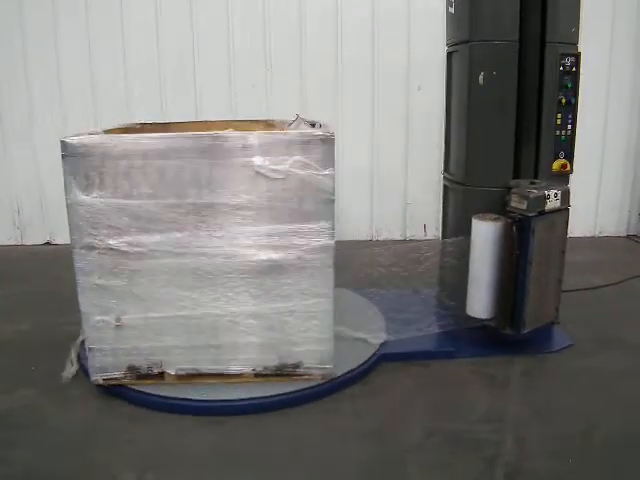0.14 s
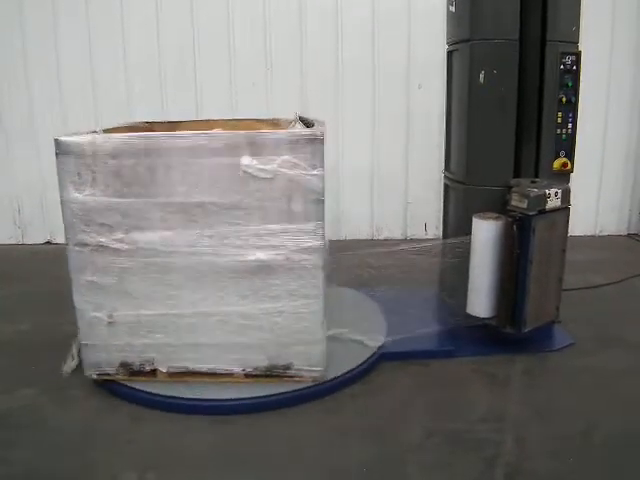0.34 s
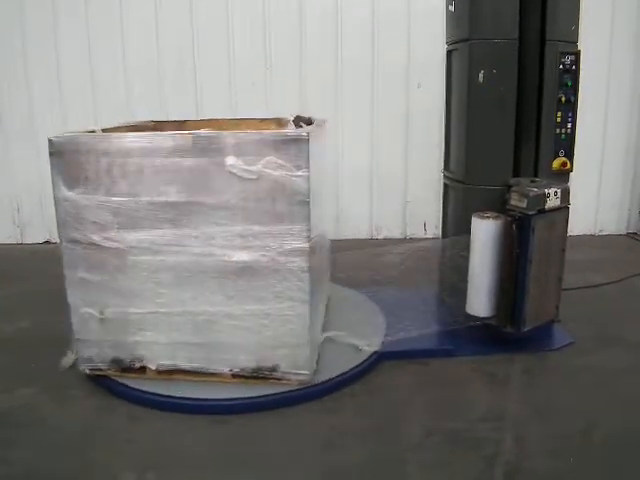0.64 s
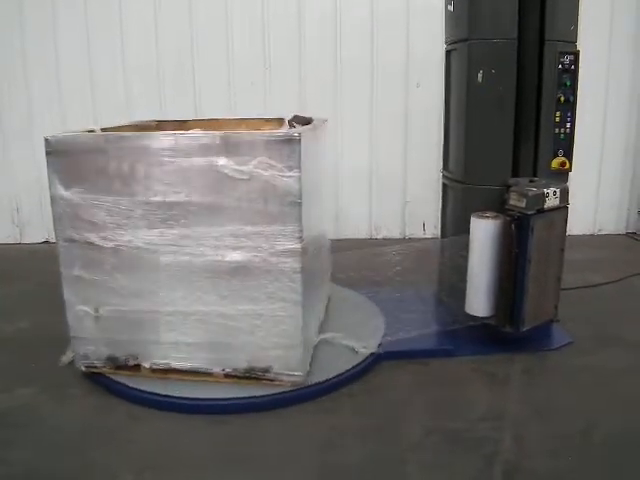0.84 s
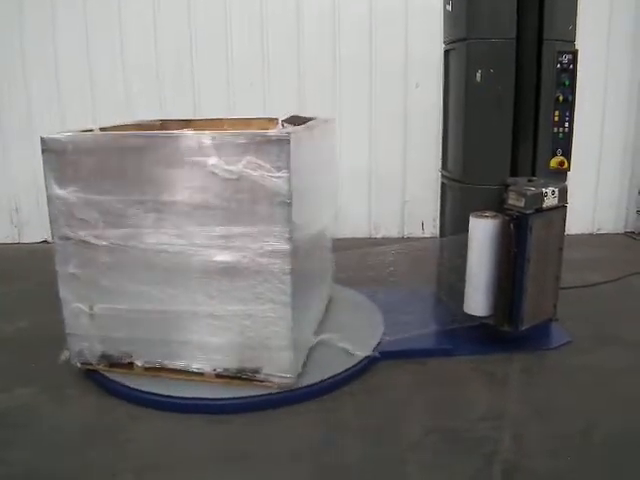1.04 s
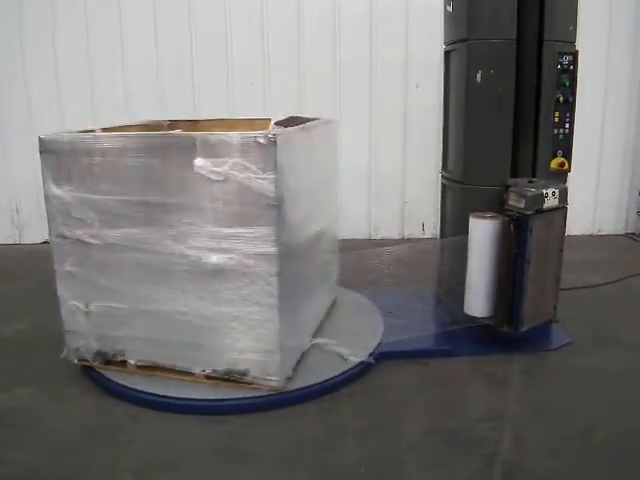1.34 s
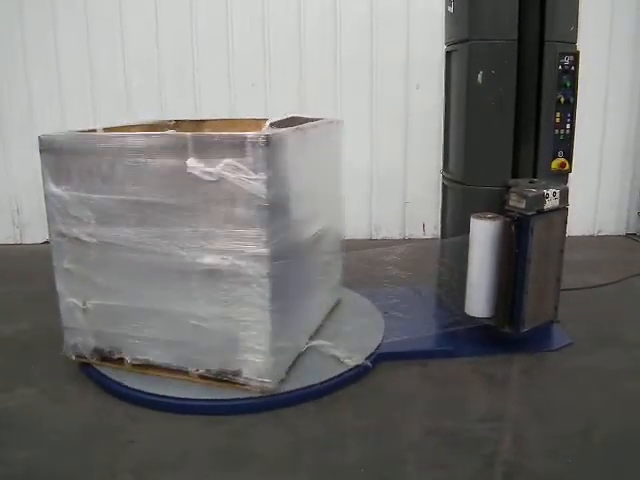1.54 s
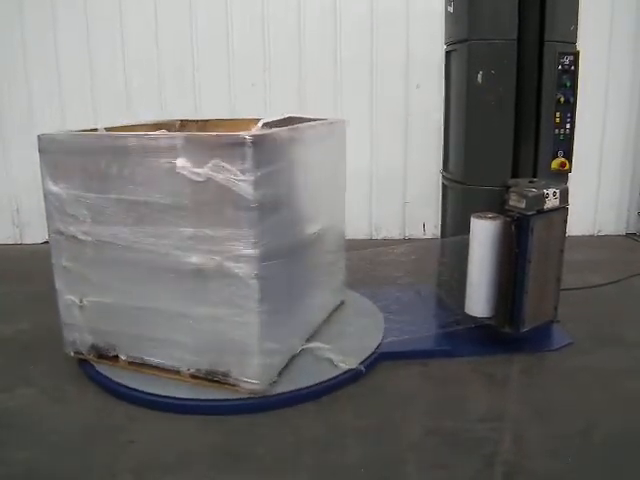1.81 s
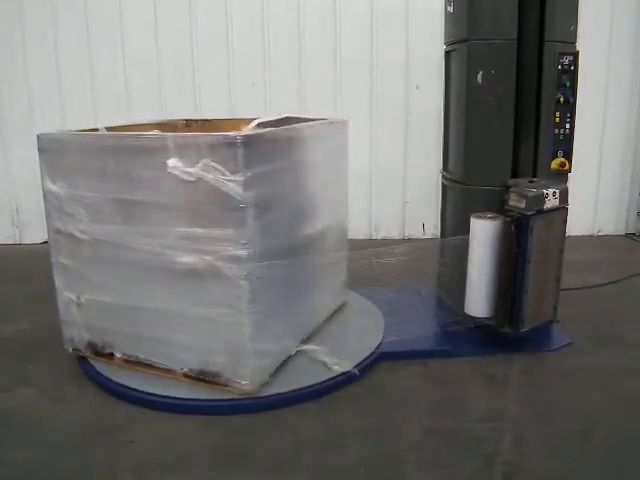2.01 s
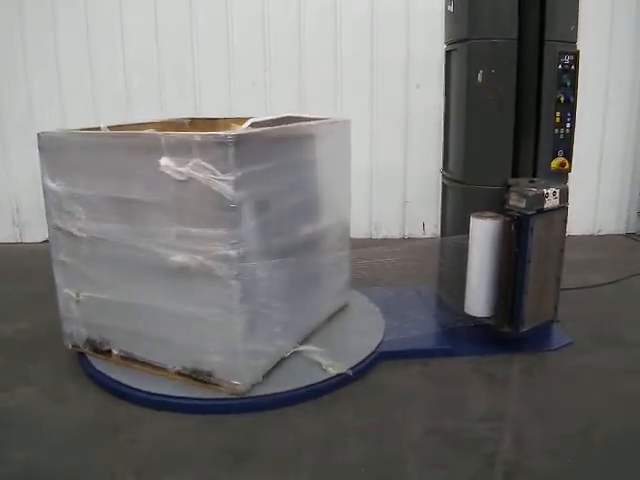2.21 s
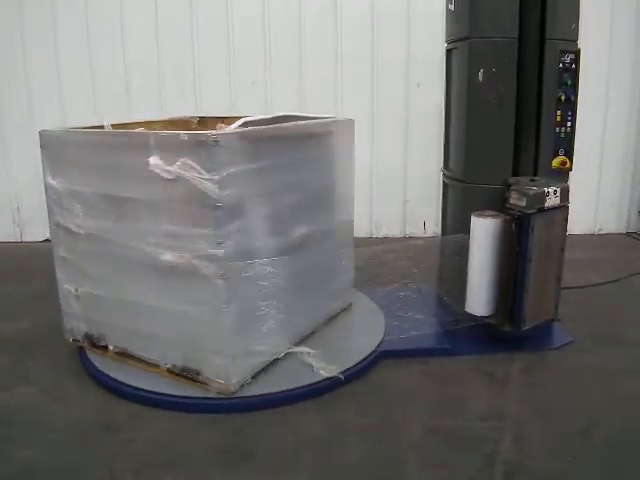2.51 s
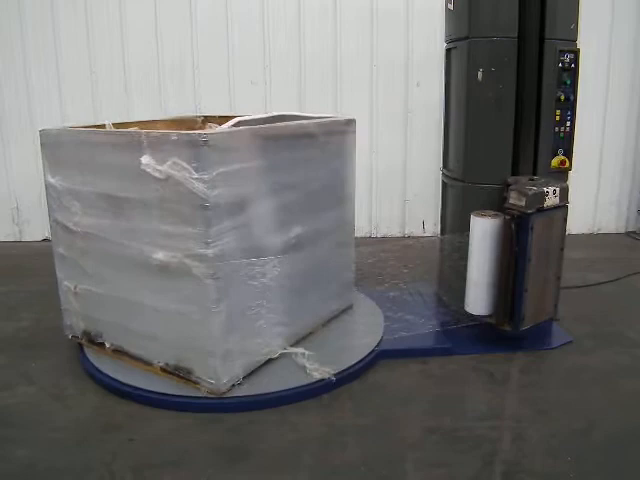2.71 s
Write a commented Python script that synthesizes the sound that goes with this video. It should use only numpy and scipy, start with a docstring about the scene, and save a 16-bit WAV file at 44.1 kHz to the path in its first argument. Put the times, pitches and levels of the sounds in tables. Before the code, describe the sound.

Turntable stretch wrapper running in a hall, low drone with plastic film peeling and crackling

```python
"""Factory hall: a turntable wrapping machine turns a pallet; its drive rumbles (coloured noise), its motor hums (tones).
Stretch film peels off the roll with a fine sizzle (noise and random grains) that swells once per turn of the roll.
Patches of film crackle (short bursts of noise and sheet resonances), and it squeaks once (four partials).
The taut film snaps twice on the load (crack, chirp, flutter); the steel carriage clinks once (decaying modes)."""
import sys
import numpy as np
from scipy import signal
from scipy.fft import rfft, irfft, next_fast_len
from scipy.io import wavfile
from scipy.ndimage import map_coordinates

SR = 44100
rng = np.random.default_rng(int(sys.argv[2]) if len(sys.argv) > 2 else 0)


def dump(signal):
    """Clip the signal to [-1, 1] and save it as 16-bit WAV at the path in sys.argv[1]."""
    limited = np.clip(np.atleast_2d(signal).T, -1, 1)
    pcm = np.round(limited * 32767).astype(np.int16)
    wavfile.write(sys.argv[1], SR, pcm)


N = 126126


def amp(db):
    """Decibels to gain."""
    return 10 ** (np.asarray(db) / 20)


def unit(x):
    """Scaled to rms 1."""
    return x / np.sqrt(np.mean(x ** 2) + 1e-20)


def along(points, hz):
    """Interpolates (Hz, value) points on a log frequency axis."""
    f, v = np.transpose(points)
    return np.interp(np.log(hz + 1), np.log(f + 1), v)


def clock():
    """Time of every sample in seconds."""
    return np.arange(N) / SR


def over_time(points, period_s=None):
    """Interpolates (s, value) points, repeating if a period is given."""
    return np.interp(clock(), *np.transpose(points), period=period_s)


def wobble(knots_per_s):
    """Smooth random curve through normal random knots."""
    return map_coordinates(rng.standard_normal(256), [clock() * knots_per_s], mode="wrap")


def filtered(x, response):
    """x times a response of frequency."""
    m = next_fast_len(N + SR // 2)
    spectrum = rfft(x, m) * response(np.fft.rfftfreq(m, 1 / SR))
    return irfft(spectrum, m)[..., :N]


def resonance(f, hz, width_hz):
    """Response of one band-pass resonance, gain 1 at its centre."""
    return 1j * f * width_hz / (hz * hz - f * f + 1j * f * width_hz)


def coloured(points):
    """Response drawn by (Hz, dB) points."""
    return lambda f: amp(along(points, f))


def noise():
    """Two unrelated white noises."""
    return rng.standard_normal((2, N))


# Likeness of left and right. Each row: frequency in Hz, correlation -1..1.
LIKENESS = [(60, .99), (110, .99), (200, .95), (380, .87), (700, .77), (1290, .27), (2400, .1), (5000, .3),
            (10000, .45), (13000, .1)]
# Stereo balance. Each row: frequency in Hz, left over right in dB.
BALANCE = [(60, -1.4), (300, -1.5), (700, -3), (1400, -3.2), (2250, -5.5), (3300, -3.5), (4600, -1),
           (6500, -4), (12000, -6.5)]


def spread(pair, colour):
    """Two unrelated signals as coloured stereo of rms 1: alike in the bass, leaning right toward the machine."""
    turn = lambda f: np.arccos(np.clip(along(LIKENESS, f), -1, 1)) / 2
    mid, side = filtered(pair, lambda f: colour(f) * np.array([np.cos(turn(f)), np.sin(turn(f))]))
    balance = lambda f: amp(np.outer([.5, -.5], along(BALANCE, f)))
    return unit(filtered(np.array([mid + side, mid - side]), balance))


WAVER_KNOTS_PER_S = 15


def tone(hz, unsteady=0):
    """Wavering stereo tone of rms 1; the hall sets its phases apart where left and right are less alike."""
    waver = 1 + unsteady * (wobble(WAVER_KNOTS_PER_S) + 1j * wobble(WAVER_KNOTS_PER_S))
    sides = np.array([[.5], [-.5]])
    apart_rad = sides * np.arccos(along(LIKENESS, hz)) * rng.choice([-1, 1])
    phase_rad = 2 * np.pi * (hz * clock() + rng.random()) + apart_rad
    wave = np.real(waver * np.exp(1j * phase_rad))
    return unit(wave * amp(sides * along(BALANCE, hz)))


def burst(start_s, rise_s, t60_s):
    """Envelope of peak 1 that rises from its start and dies away exponentially."""
    t = np.maximum(clock() - start_s, 0)
    shape = (1 - np.exp(-(t / rise_s) ** 2)) * amp(-60 * t / t60_s)
    return shape / (shape.max() + 1e-12)


# Colour of drive rumble and hall noise. Each row: frequency in Hz, relative density in dB per Hz.
RUMBLE_COLOUR = [(20, -34), (27, -22), (36, -26), (52, -14.5), (80, -12.5), (105, -7), (167, -2.5),
                 (210, -4), (330, -5.5), (420, -7.5), (520, -9.5), (690, -10), (1240, -17.5), (1650, -19.5),
                 (2300, -18.5), (2780, -22.5), (6370, -30.5), (10000, -38), (15000, -59)]
RUMBLE_DB = -20.5
# Narrow resonances of the gearing. Each row: frequency in Hz, width in Hz, rms level in dB.
GEAR_WHINE = [(2197, 36, -41.5), (2270, 130, -42), (2777, 40, -51), (4622, 30, -53), (6390, 60, -52)]


def drive():
    """The turntable's broadband rumble, with noise ringing narrow gear resonances above it."""
    level_db = RUMBLE_DB + 0.16 * wobble(6.88)
    out = amp(level_db) * spread(noise(), coloured(RUMBLE_COLOUR))
    for hz, width_hz, db in GEAR_WHINE:
        out += amp(db) * spread(noise(), lambda f: resonance(f, hz, width_hz))
    return out


# Swell of the mains hum. Each row: time in seconds, level in dB before HUM_GAIN_DB.
HUM_SWELL = [(0.0, -22.5), (0.12, -24.5), (0.25, -18), (0.36, -30), (0.45, -16), (0.54, -37), (0.6, -26),
             (0.72, -42), (0.86, -19.5), (0.91, -32), (1.0, -14.5), (1.13, -26.5), (1.2, -16.5),
             (1.26, -27), (1.34, -17.5), (1.47, -41), (1.53, -21), (1.64, -30), (1.92, -17), (1.99, -22),
             (2.13, -19.5), (2.29, -26), (2.36, -45), (2.86, -24.5)]
# Swell of the hum's octave. Each row: time in seconds, level in dB before OCTAVE_GAIN_DB.
OCTAVE_SWELL = [(0.0, -29), (0.26, -25), (0.72, -40.5), (0.94, -23.5), (1.11, -34.5), (1.22, -22.5),
                (1.35, -47), (1.47, -29), (2.25, -27), (2.3, -40), (2.33, -39), (2.86, -27)]
HUM_HZ, HUM_GAIN_DB, OCTAVE_GAIN_DB = 120.05, -2.5, 1
HUM_WAVER, OCTAVE_WAVER = .07, .16  # depth 0-1
# Other tones of the drive. Each row: frequency in Hz, rms level in dB, unsteadiness 0-1.
DRIVE_TONES = [(58.5, -40.5, 0.2), (306, -39, 1), (335, -37, 1), (360.8, -33, 0.75), (392.8, -38, 1),
               (481.3, -42, 0.76), (834, -43.5, 0.3), (5070, -67, 0.6), (7090, -57, 1)]


def motor():
    """Mains hum and its octave swell and fade over weaker, wavering tones."""
    hum = amp(HUM_GAIN_DB + over_time(HUM_SWELL)) * tone(HUM_HZ, HUM_WAVER)
    octave = amp(OCTAVE_GAIN_DB + over_time(OCTAVE_SWELL)) * tone(2 * HUM_HZ, OCTAVE_WAVER)
    others = sum(amp(db) * tone(hz, unsteady) for hz, db, unsteady in DRIVE_TONES)
    return hum + octave + others


# Peeling effort over one turn of the roll. Each row: seconds into the turn, relative level in dB.
PEEL_TURN = [(0, -6.5), (.12, -3.5), (.25, -1.5), (.36, 1), (.45, -0.5), (.52, -9.5), (.68, -15.5),
             (.78, -17.5)]
# Louder start of the peeling, settling within the first second. Each row: time in seconds, relative level in dB.
OPENING_SWELL = [(0, 5), (.22, 1.5), (.85, -.5), (2.0, -1), (2.86, -0.5)]
# Colour of the film's sizzle. Each row: frequency in Hz, relative density in dB per Hz.
SIZZLE_COLOUR = [(500, -32), (1500, -2), (3000, 5), (4300, 2), (5700, 2.5), (6500, 8), (7500, 2.5),
                 (9300, -4), (10400, 2), (12500, -7.5), (15000, -11.5)]
ROLL_TURN_S, SIZZLE_DB = 0.854, -28
GRAINS_PER_S, GRAIN_SPREAD_DB, GRAIN_POWER_SHARE = 1100, 1.5, 0.3
CRINKLES_PER_S, CRINKLE_DB, CRINKLE_HZ = 60, -36, 3200


def peel():
    """Tiny releases of tacky film merge into a sizzle, with small crinkles, that follows the turning roll."""
    effort_db = over_time(PEEL_TURN, ROLL_TURN_S) + over_time(OPENING_SWELL)
    grains = (rng.random(N) < GRAINS_PER_S / SR) * amp(GRAIN_SPREAD_DB * rng.standard_normal(N))
    grainy = np.sqrt(GRAIN_POWER_SHARE) * unit(grains * noise())
    smooth = np.sqrt(1 - GRAIN_POWER_SHARE) * noise()
    sizzle_db = SIZZLE_DB + effort_db + 0.91 * wobble(40.17)
    sizzle = amp(sizzle_db) * spread(grainy + smooth, coloured(SIZZLE_COLOUR))
    folds = signal.fftconvolve(rng.random(N) < CRINKLES_PER_S / SR, burst(0, .0003, .01))[:N]
    crinkles = spread(folds * noise(), lambda f: resonance(f, CRINKLE_HZ, CRINKLE_HZ) ** 3)
    return sizzle + amp(CRINKLE_DB + effort_db) * crinkles


# Larger releases of film. Each row: start in seconds, level in dB, tilt above 2 kHz in dB per octave.
CRACKLE_EVENTS = [(.357, -25, 2), (.3865, -24, -1), (.4165, -26, -2), (.4765, -26, -2), (.828, -30, 4),
                  (.9865, -18.5, -2), (1.198, -24, -3), (1.2067, -17, -1), (1.248, -27, 0),
                  (1.3004, -24, 3), (1.43, -32, 1), (1.658, -30, 6), (1.8705, -18, 3), (1.9968, -15, -2),
                  (2.0578, -17, -1), (2.6803, -25, 2)]
# Modes of the taut sheet. Each row: frequency in Hz, relative level in dB.
SHEET_MODES = [(2200, -5), (2790, 1), (3570, 0), (4850, 0), (6370, -3), (6900, -7)]
CRACKLE_RISE_S, CRACKLE_T60_S = .0014, .03
RING_OVER_RIP_DB, MODE_WIDTH_HZ = 0, 30


def crackles():
    """Larger patches of film let go at once and ring the taut sheet."""
    sizzle = spread(noise(), coloured(SIZZLE_COLOUR))
    sheet = lambda f: sum(amp(level) * resonance(f, hz, MODE_WIDTH_HZ) for hz, level in SHEET_MODES)
    out = np.zeros((2, N))
    for start_s, db, tilt_db in CRACKLE_EVENTS:
        rip = unit(filtered(sizzle, lambda f: amp(tilt_db * np.log2(np.maximum(f, 2000) / 2000))))
        ring = spread(noise(), sheet)
        envelope = burst(start_s, CRACKLE_RISE_S, CRACKLE_T60_S)
        out += amp(db) * envelope * unit(rip + amp(RING_OVER_RIP_DB) * ring)
    return out


# Partials of the film's squeak. Each row: frequency in Hz, level at the top of the swell in dB.
SQUEAK_PARTIALS = [(4420, -42), (4996, -39), (5755, -41.5), (6589, -42)]
SQUEAK_START_S, SQUEAK_LENGTH_S = .452, .055


def squeak():
    """The film sticks and slips on the roll for a moment: steady partials under one half-sine swell."""
    progress = np.clip((clock() - SQUEAK_START_S) / SQUEAK_LENGTH_S, 0, 1)
    return np.sin(np.pi * progress) * sum(amp(db) * tone(hz) for hz, db in SQUEAK_PARTIALS)


# Slips of the taut film on the load. Each row: start in seconds, chirp level in dB, pitch in Hz,
# crack over chirp in dB, flutter over chirp in dB.
SNAP_EVENTS = [(1.096, -16.5, 2650, .5, -6.5), (1.5968, -12, 2300, -7.5, -20)]
# Colour of the crack. Each row: frequency in Hz, relative density in dB per Hz.
CRACK_COLOUR = [(700, -30), (1300, -7), (1800, 2), (3400, -1), (4600, -8), (6500, -8), (8000, -25),
                (14000, -38)]
CRACK_RISE_S, CRACK_T60_S = .0015, .04
CHIRP_DELAY_S, CHIRP_RISE_S, CHIRP_T60_S, CHIRP_WIDTH_HZ = .003, .0025, .026, 900
FLUTTER_ROUGH_DB, FLUTTER_T60_S = 3, .17


def snaps():
    """The taut film slips: a broad crack, a short pitched chirp, a crackly flutter fading in the wrapped load."""
    out = np.zeros((2, N))
    for start_s, db, hz, crack_db, flutter_db in SNAP_EVENTS:
        chirp_s = start_s + CHIRP_DELAY_S
        crack = spread(noise(), coloured(CRACK_COLOUR)) * burst(start_s, CRACK_RISE_S, CRACK_T60_S)
        hiss = spread(noise(), lambda f: resonance(f, hz, CHIRP_WIDTH_HZ) * resonance(f, hz, hz))
        chirp = unit(.5 * tone(hz) + hiss) * burst(chirp_s, CHIRP_RISE_S, CHIRP_T60_S)
        rough = spread(noise(), lambda f: resonance(f, hz, hz) ** 2) * amp(FLUTTER_ROUGH_DB * wobble(300))
        flutter = unit(rough) * burst(chirp_s, CHIRP_RISE_S, FLUTTER_T60_S)
        out += amp(db) * (chirp + amp(crack_db) * crack + amp(flutter_db) * flutter)
    return out


# Modes of the steel carriage. Each row: frequency in Hz, relative level in dB, t60 in seconds.
STEEL_MODES = [(2745, -6, .08), (3575, -9, .15), (4624, -4, .28), (6008, -4, .15), (6164, -8, .12),
               (6420, 1, .05), (6675, -3, .3), (9518, -12, .07)]
CLINK_START_S, CLINK_RISE_S, CLINK_DB = 2.8085, .003, -24.5
SCRAPE_GAIN_DB, SCRAPE_T60_S = 7, .098


def clink():
    """A light scraping knock rings the steel film carriage in clear tones."""
    ring = sum(amp(db) * burst(CLINK_START_S, CLINK_RISE_S, t60_s) * tone(hz) for hz, db, t60_s in STEEL_MODES)
    scrape = spread(noise(), lambda f: resonance(f, 3300, 6500) ** 3)
    scrape = scrape * burst(CLINK_START_S, CLINK_RISE_S, SCRAPE_T60_S)
    return amp(CLINK_DB) * (ring + amp(SCRAPE_GAIN_DB) * scrape)


HALL_T60_S, HALL_DB = 0.35, -6.5


def hall(x):
    """The hall's diffuse answer: decaying noise that starts after 6 ms."""
    t = np.arange(SR // 2) / SR
    tail = rng.standard_normal((2, len(t))) * amp(-60 * t / HALL_T60_S) * (t > .006)
    return signal.fftconvolve(x, tail / np.linalg.norm(tail[0]), axes=1)[:, :N]


def scene():
    """The running machine, with crackles, snaps and clink echoing in the hall."""
    sharp = crackles() + snaps() + clink()
    return drive() + motor() + peel() + squeak() + sharp + amp(HALL_DB) * hall(sharp)


# Dips of the recorder's notch filters. Each row: centre in Hz, half-width scale in Hz.
TREBLE_DIPS = [(7920, 367), (8780, 498), (11700, 370)]
TOP_HZ, LEFT_LAG_S = 15300, .000062


def record(dry):
    """The left microphone hears slightly later; the recorder cuts three treble dips and limits the band."""
    dips = lambda f: np.prod([1 - np.exp(-((f - hz) / width_hz) ** 4) for hz, width_hz in TREBLE_DIPS], axis=0)
    lag = lambda f: np.exp(-2j * np.pi * np.outer([LEFT_LAG_S, 0], f))
    return filtered(dry, lambda f: lag(f) * dips(f) * (f < TOP_HZ))


dry = scene()
out = record(dry)
dump(out)
```